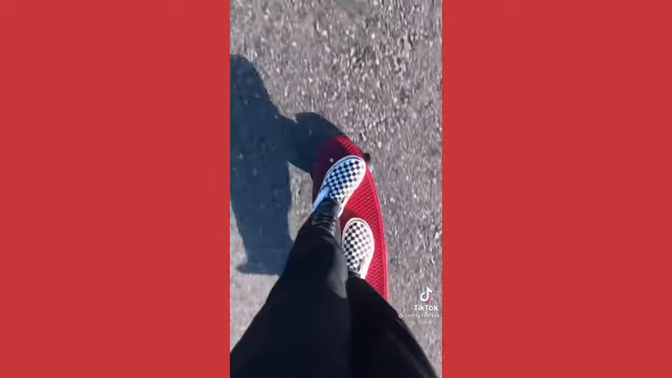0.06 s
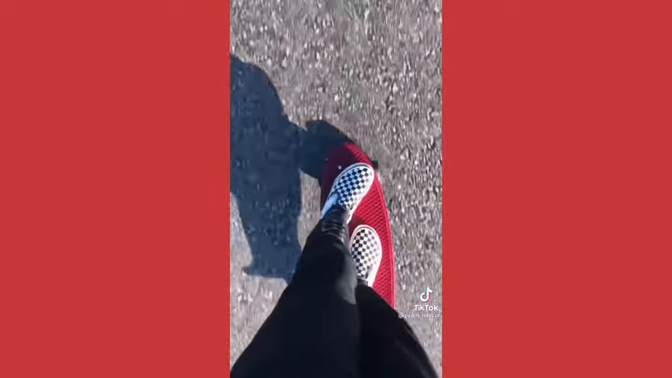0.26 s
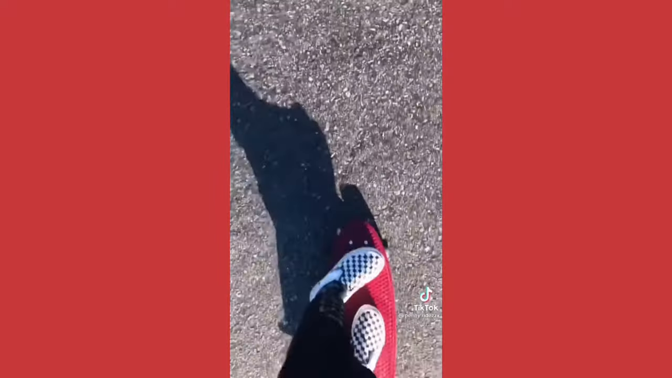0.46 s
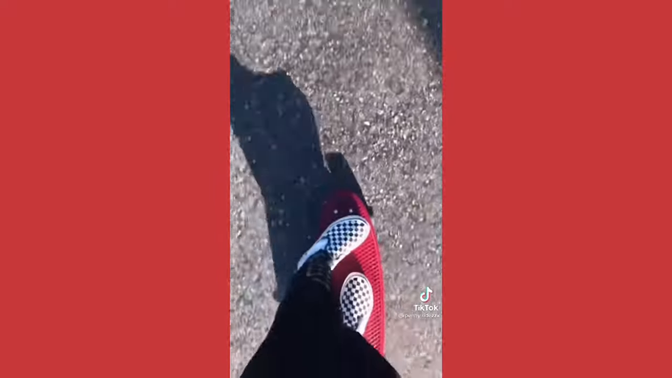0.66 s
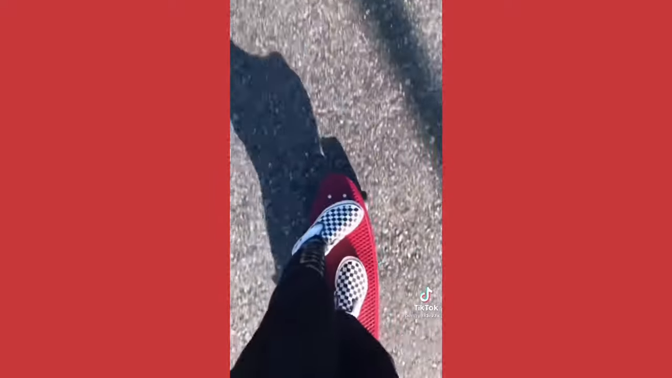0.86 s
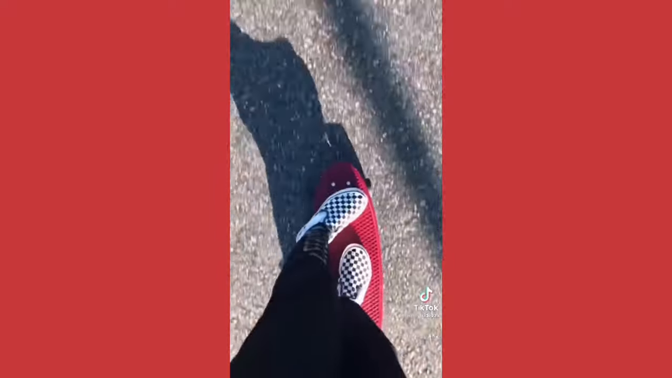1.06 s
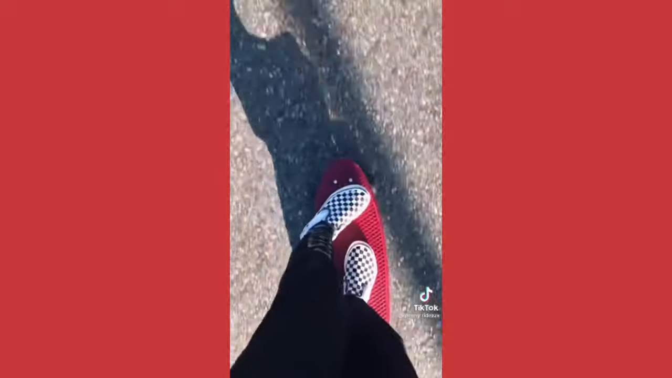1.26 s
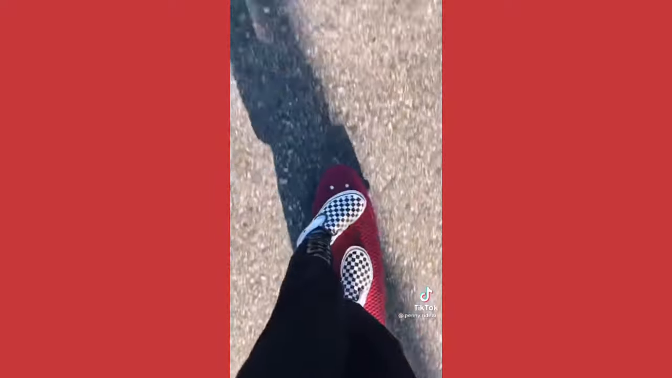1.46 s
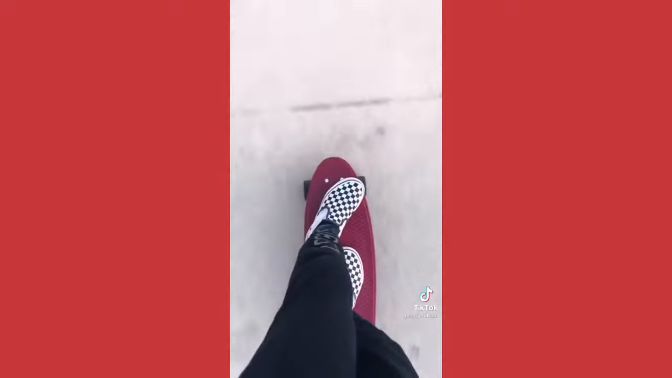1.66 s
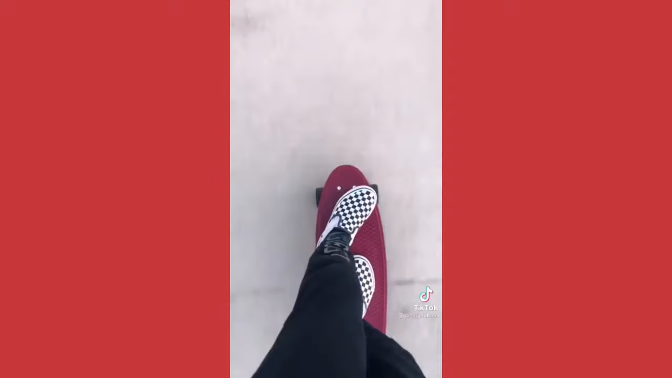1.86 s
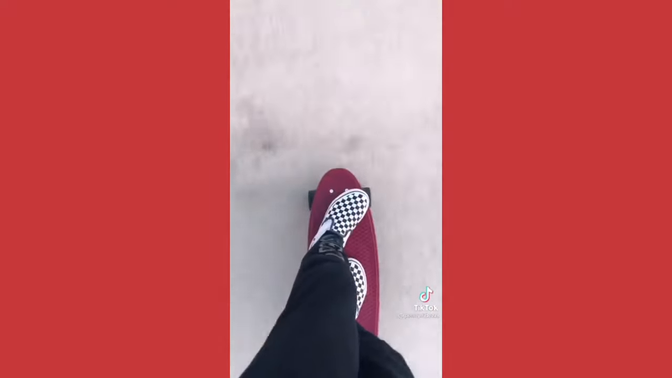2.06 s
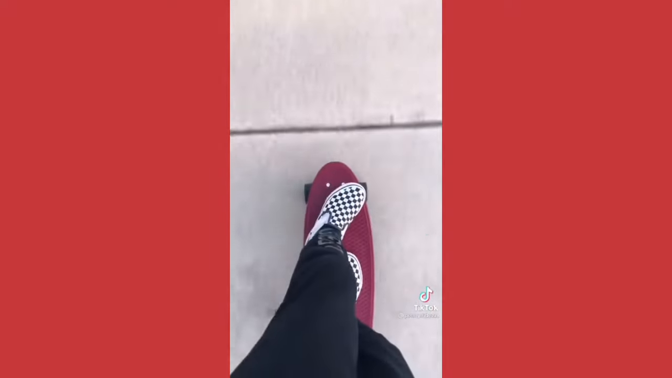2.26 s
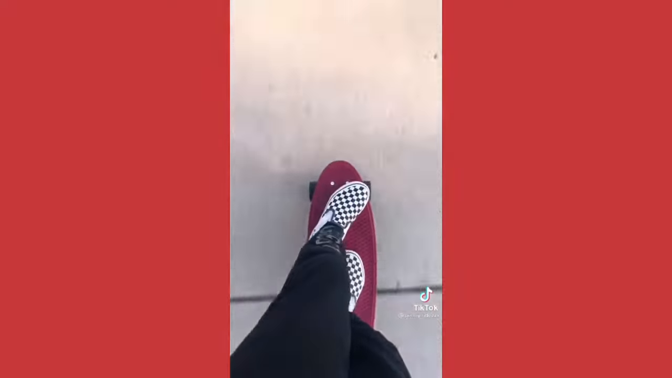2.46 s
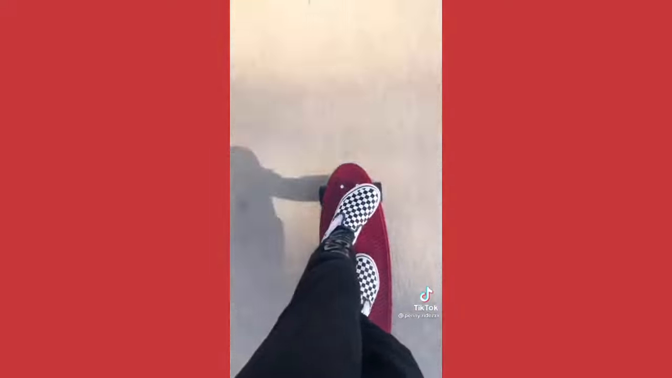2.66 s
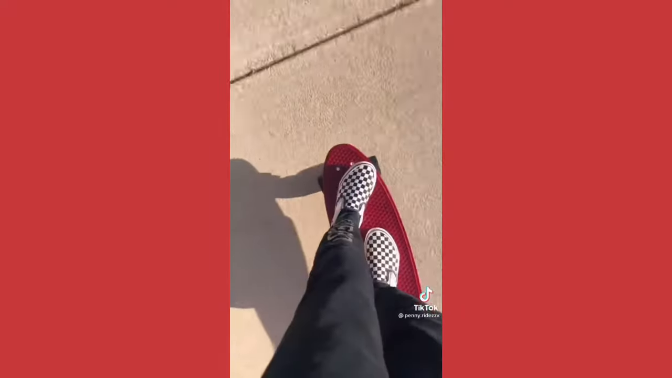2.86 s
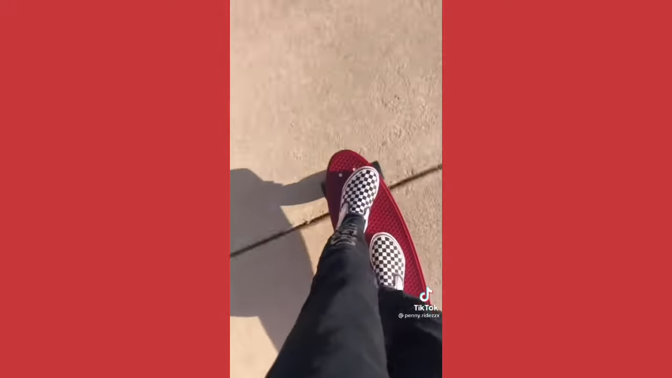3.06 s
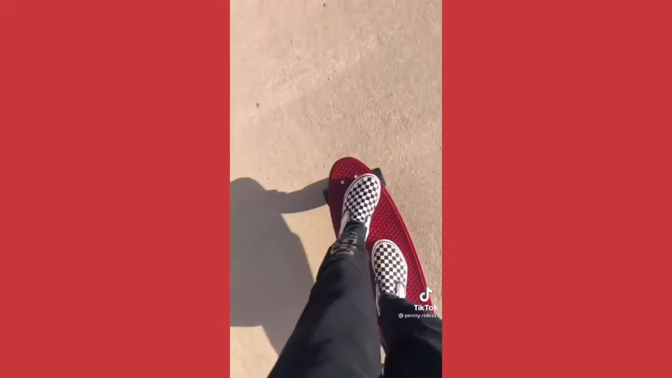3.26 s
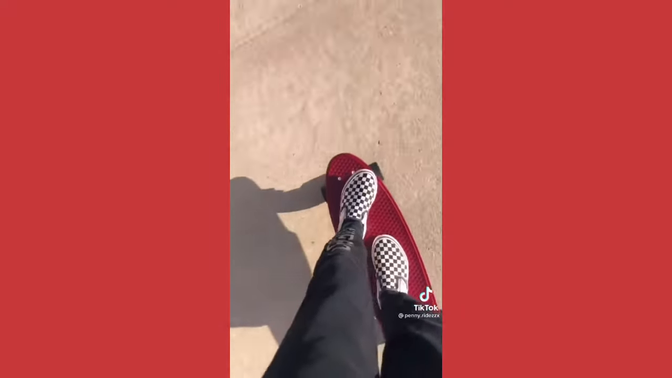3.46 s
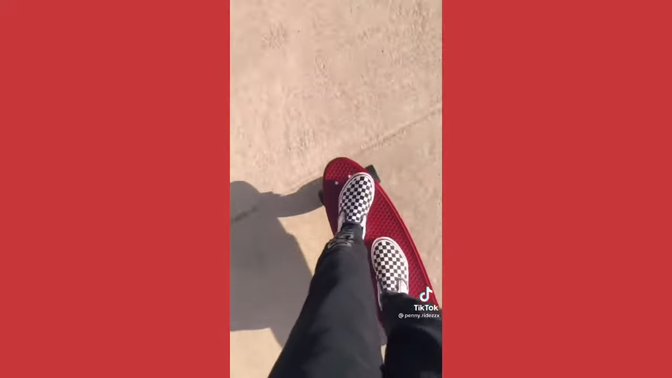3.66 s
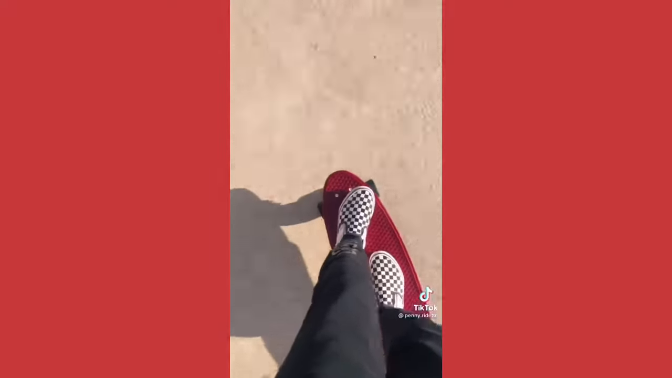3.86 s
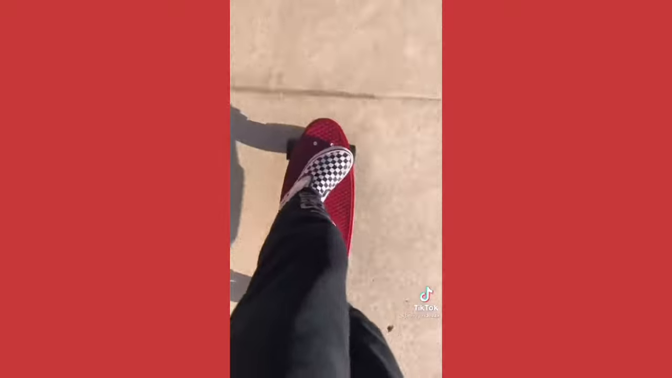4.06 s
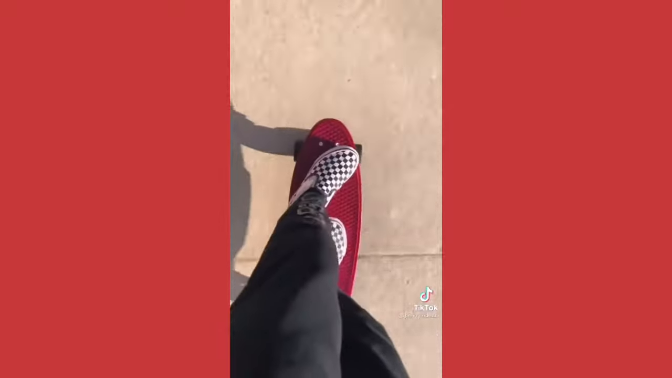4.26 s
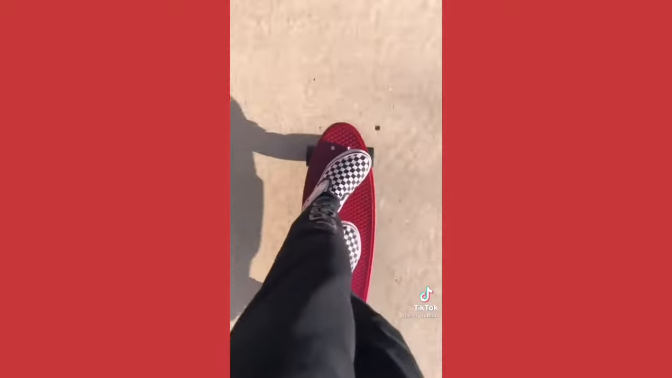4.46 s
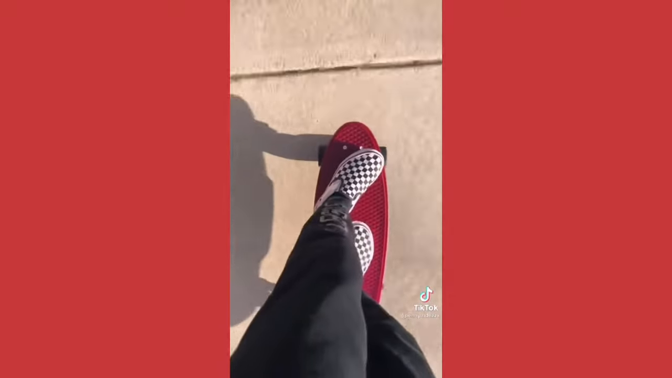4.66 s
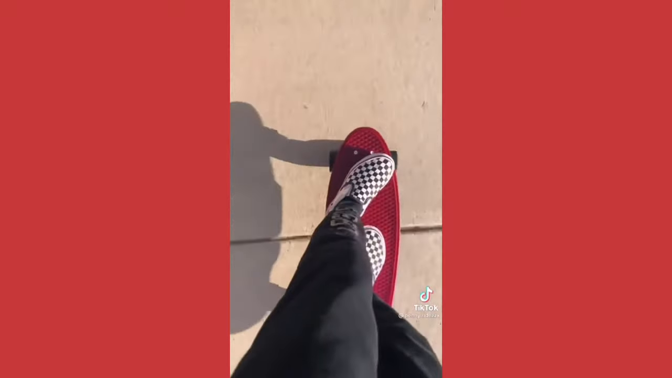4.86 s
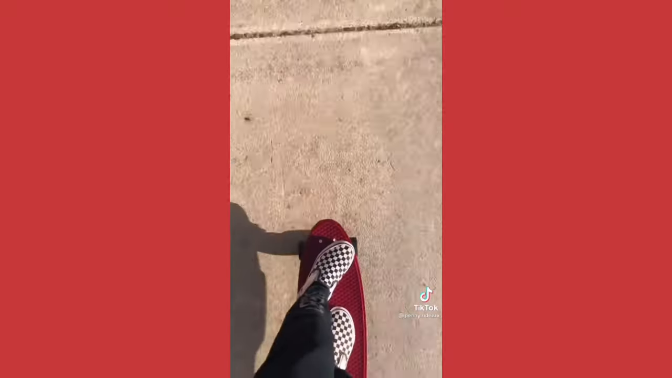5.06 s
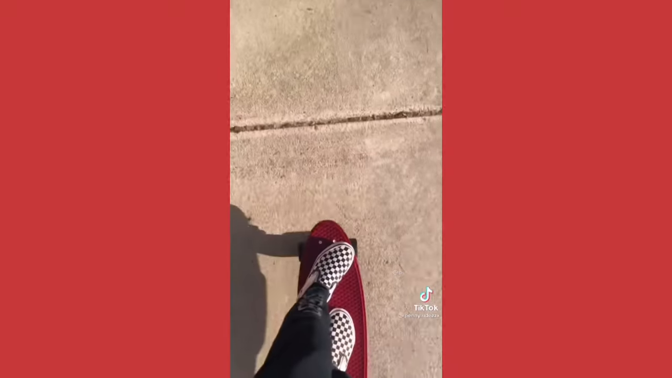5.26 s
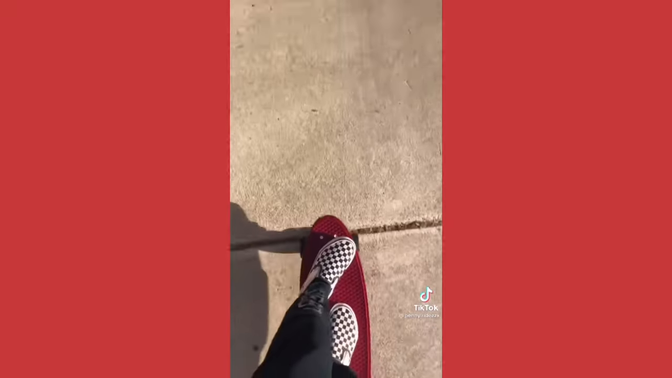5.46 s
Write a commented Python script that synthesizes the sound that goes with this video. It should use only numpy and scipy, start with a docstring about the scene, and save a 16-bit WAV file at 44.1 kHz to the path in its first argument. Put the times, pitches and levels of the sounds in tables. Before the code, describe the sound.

Six brief passages of a plastic skateboard rolling outdoors, separated by total silences of about a tenth of a second. The first two are rough and crackly on asphalt, with loose axle rattle. The rest run over concrete slabs, softer and steadier, broken by loud paired knocks as front and rear wheels strike the joints. Close, dry microphone held by the rider above the board.

```python
"""On coarse asphalt, then on concrete slabs, a small plastic skateboard rolls, heard from above it.
Random grit impulses excite the modes of the deck and rattle the loose steel of the axles; tread hiss and a
low rumble are shaped noise. At each slab joint a wheel pair drops in and hits the far edge: short rough
contacts ring the deck, rim and steel, and the rider's weight lands. Short silences part six passages."""
import sys
import numpy as np
from scipy import signal
from scipy.fft import rfft, irfft, next_fast_len
from scipy.io import wavfile
from scipy.ndimage import map_coordinates

SR = 44100
rng = np.random.default_rng(int(sys.argv[2]) if len(sys.argv) > 2 else 0)


def pcm_store(signal):
    """Save signal as 16-bit PCM."""
    levels = np.round(np.clip(np.atleast_2d(signal), -1, 1) * 32767)
    wavfile.write(sys.argv[1], SR, levels.astype(np.int16).T)


N = 243123

# silences between the six passages: start_s, end_s
SILENCES = [(0.3252, 0.4511), (1.4593, 1.5853), (2.693, 2.8086), (3.8612, 3.969), (5.0252, 5.1401)]
# resonances of the deck and wheels, low to high: centre_hz, width_hz, relative level_db
DECK = [(343, 305, -9.5), (492, 31, -7), (588.2, 87, 3), (680, 50, -29.5), (870, 240, -17),
        (1128, 110, -15), (1660, 280, -28), (2123, 61, -28.5), (2367, 394, -35.5), (4400, 1100, -52.5)]
# resonances of washers, axle and bearings, low to high: centre_hz, width_hz, relative level_db
STEEL = [(4460, 1500, 0.5), (7750, 580, 8.5), (8400, 1500, -2), (9800, 1100, -8.5), (11480, 550, -12.5),
         (13450, 2400, 2)]


def amp(db):
    """Amplitude ratio: 20 dB is a factor of ten."""
    return 10 ** (np.asarray(db) / 20)


def unit(x):
    """Normalisation to an rms amplitude of 1."""
    return x / np.sqrt(np.mean(x ** 2) + 1e-20)


def curves(rows):
    """Linear interpolation over time: one curve for each column after the time."""
    time_s, *columns = np.transpose(rows)
    return [np.interp(np.arange(N) / SR, time_s, column) for column in columns]


def wobble(rate):
    """Slow random modulation: a smooth curve through rate random knots a second."""
    knots = rng.standard_normal(int(N * rate / SR) + 4)
    return map_coordinates(knots, [np.arange(N) * rate / SR])


def filtered(x, response):
    """Linear filtering: the spectrum of x times a response given as a function of frequency."""
    n = x.shape[-1]
    padded = 2 * next_fast_len(n // 2 + 2048)
    spectrum = rfft(x, padded) * response(np.fft.rfftfreq(padded, 1 / SR))
    return irfft(spectrum, padded)[..., :n]


def ringing(modes):
    """Modal resonance with minimum phase; soft wheels dull the upper skirt of each mode."""
    def response(f):
        f = f + 1  # avoids division by zero
        power = 0
        for centre, width, db in modes:
            resonance = amp(2 * db) / (1 + ((f * f - centre * centre) / (f * width)) ** 2)
            power = power + resonance / (1 + (f / (1.336 * centre)) ** 4)
        # folding the cepstrum onto positive times makes the response causal
        cepstrum = irfft(np.log(power + 1e-14) / 2)
        half = cepstrum.shape[-1] // 2
        cepstrum[..., 1:half] *= 2
        cepstrum[..., half + 1:] = 0
        return np.exp(rfft(cepstrum))
    return response


def grit(per_s, spread_db):
    """Shot noise: random tiny pushes of either sign, a few much larger than the rest."""
    chance, side, size = rng.random((3, N))
    occurs = chance < per_s / SR
    return occurs * np.sign(side - .5) * amp(-spread_db * np.log(size + 0.0024))


def knock(modes, peak_db, contact_ms, shudder_db=-60, shudder_s=.05, size=SR // 12):
    """Impact excitation: rows of rough pushes and decaying ragged shudders ring the modes up to set peaks."""
    t = np.arange(size) / SR
    phase = t / (np.maximum(contact_ms, .2)[:, None] / 1000)
    progress = np.clip(phase, 0, 1)  # 0 to 1 through the contact
    knots = rng.standard_normal((len(phase), 40))
    places = np.broadcast_arrays(np.arange(len(phase))[:, None], t * 400)  # 400 knots a second
    ragged = amp(4.2 * map_coordinates(knots, places))
    shudder = amp(shudder_db - 60 * t / shudder_s) * progress * ragged  # falls 60 dB in shudder_s
    push = (np.sin(np.pi * progress) ** 2 + shudder) * rng.standard_normal(phase.shape)
    ring = filtered(push, ringing(modes))
    envelope_peak = np.abs(signal.hilbert(ring)).max(1)
    return ring * (amp(peak_db) / envelope_peak)[:, None]


def add(track, times, rows):
    """Superposition: each row is summed into the track at its time."""
    for s, row in zip(times, rows):
        part = track[round(s * SR):][:len(row)]
        part += row[:len(part)]
    return track


def low_rumble():
    """Broadband excitation by ground and wind: noise with a falling spectrum."""
    # spectrum of the rumble: frequency_hz, relative level_db
    spectrum = [(15, -36.5), (25, -1.5), (44, -1), (120, -0.5), (200, -6.5), (400, -12.5), (800, -52.5),
                (2000, -120)]
    hz, db = np.transpose(spectrum)
    noise = rng.standard_normal(N)
    return unit(filtered(noise, lambda f: amp(np.interp(np.log(f + 1), np.log(hz), db))))


def sand_like_hiss():
    """Band-shaped noise under an exponential envelope: a short hiss like sand swells, then stops."""
    peak_s, hiss_db = 1.645, -46
    swell_db_per_s, stop_db_per_s = 110, 750
    t = np.arange(N) / SR - peak_s
    level_db = hiss_db + np.where(t < 0, swell_db_per_s, -stop_db_per_s) * t
    noise = rng.standard_normal(N)
    return amp(level_db) * unit(filtered(noise, ringing([(7990, 1000, 0), (13000, 9200, 0)])))


def tread_hiss():
    """Friction noise of the tread: steady noise in two broad resonances."""
    noise = rng.standard_normal(N)
    return unit(filtered(noise, ringing([(4140, 3700, 6.5), (9500, 5000, -3.5)])))


def axle_chatter(shake):
    """Intermittent contact of loose parts: two trains of pushes and noise share the same bursts."""
    burst = amp(2.26 * shake + 4.3 * wobble(120) + 4.5 * wobble(31.29))
    trains = []
    for part in range(2):
        pushes = unit(grit(970, 3.8) * burst * amp(0.6 * wobble(90)))
        trains.append(pushes + 0.32 * unit(burst * rng.standard_normal(N)))
    return trains


def steel_rattle(chatter):
    """Modal ringing of small steel: chatter excites washers and bearings, which radiate no lower tones."""
    washers = filtered(chatter[0], ringing(STEEL[1:3]))
    bearings = filtered(chatter[1], ringing(STEEL[3:]))
    rattle = unit(washers + bearings)
    return filtered(rattle, lambda f: 1 / np.sqrt(1 + (6600 / (f + 1)) ** 8))


def wheel_clatter(chatter):
    """Forced vibration: wheels knocking on their axles ring the highest modes."""
    return unit(filtered(chatter, ringing(DECK[7:])))


def sharp_stones(shake):
    """Sparse impulse excitation: sharp stones ring the upper modes of the deck."""
    pushes = grit(900, 4.3) * amp(1.5 * shake)
    return unit(filtered(pushes, ringing(DECK[3:9])))


def deck_roar(coarse_db, shake):
    """Roughness excitation: the grit under the wheels drives all modes of the deck."""
    pushes = grit(2500, coarse_db) / amp(1.26 * coarse_db)  # offsets the larger pushes of coarse ground
    return unit(filtered(pushes * amp(1.07 * coarse_db * shake), ringing(DECK)))


def rolling():
    """Rolling noise: ground roughness shakes deck, tread, wheels and steel together, above a low rumble."""
    # levels over time: time_s, deck_db, axle_rattle_db (before its drift), rumble_db (before its wobble)
    levels = [(0, -31.5, -51, -33), (.07, -33, -60.5, -38), (.19, -25.5, -48.5, -35), (.3, -31.5, -59, -44),
              (.5, -31, -55, -38.5), (.85, -30.5, -55, -43), (.91, -28, -51, -40),
              (1.01, -30.5, -60, -39.5), (1.4, -31, -55, -39.5), (1.62, -28.5, -52, -36.5),
              (1.8, -32, -75.5, -39), (2.09, -33, -62.5, -38), (2.5, -32, -62.5, -33.5),
              (2.85, -34.5, -62.5, -38), (3.1, -35, -60.5, -31.5), (3.45, -35, -64, -38.5),
              (3.8, -34, -61.5, -35.5), (4.05, -37, -68, -36.5), (4.45, -37, -65.5, -38),
              (4.7, -33.5, -60.5, -37), (5.0, -38, -71, -36), (5.2, -37.5, -64.5, -38.5),
              (5.51, -35, -55, -32)]
    # one row a passage: coarseness_db (scales the spread of grit sizes);
    # relative to the deck: tread_db, wheel_clatter_db, upper_mode_db
    ground = [(2.601, -38, -16.5, -16.5), (2.6, -49, -20.5, -12), (.73, -30.5, -20, -20.5),
              (0.728, -33.5, -22.5, -18.5), (.73, -33.5, -43, -26), (1.701, -33.5, -20.5, -13.5)]
    deck_db, rattle_db, rumble_db = curves(levels)
    passage = np.searchsorted([end for start, end in SILENCES], np.arange(N) / SR)
    coarse_db, tread_db, clatter_db, upper_db = np.transpose(ground)[:, passage]
    shake = wobble(60)  # patches of rougher ground
    chatter = axle_chatter(shake)
    drift_db = 2.5 * wobble(9)  # the rattle comes and goes
    board = amp(rumble_db + 1.0 * wobble(10)) * low_rumble()
    board += amp(deck_db + tread_db + 2.1 * shake) * tread_hiss()
    board += amp(rattle_db + drift_db) * steel_rattle(chatter)
    board += amp(deck_db + clatter_db) * wheel_clatter(chatter[0])
    board += amp(deck_db + upper_db) * sharp_stones(shake)
    return board + amp(deck_db) * deck_roar(coarse_db, shake)


def ticks():
    """Impact of small stiff bodies: loose steel parts click together."""
    # clearest ticks: time_s, peak_db
    clicks = [(0.167, -31), (0.454, -36), (0.619, -34.5), (0.73, -37), (0.788, -40), (0.9687, -45),
              (1.038, -34.5), (1.0944, -36), (1.1473, -33.5), (1.419, -35.5), (2.0612, -39.5),
              (2.097, -38.5), (2.3025, -27.5), (2.944, -41.5), (4.0208, -46), (4.785, -41.5), (5.1654, -45),
              (5.284, -38.5), (5.3765, -37.5)]
    time_s, peak_db = np.transpose(clicks)
    contact_ms = np.full(len(time_s), 3.5)
    rows = knock(STEEL[1:], peak_db, contact_ms, -15, 0.011)
    return add(np.zeros(N), time_s - .0005, rows)


def stones():
    """Impulse response: each larger stone gives the lower modes of the deck one short knock."""
    # largest single stones: time_s, peak_db
    largest = [(0.128, -16), (0.193, -25), (0.456, -17), (0.544, -19.5), (0.63, -17), (0.739, -17.5),
               (0.842, -18), (0.909, -14), (0.935, -15), (0.974, -16), (1.042, -16), (1.158, -15.5),
               (1.24, -20), (1.269, -15.5), (1.349, -17.5), (1.39, -17.5), (5.22, -20.5), (5.304, -29),
               (5.391, -23.5)]
    time_s, peak_db = np.transpose(largest)
    contact_ms = np.full(len(time_s), 8)
    rows = knock(DECK[:6], peak_db, contact_ms, -8.5, 0.04)
    return add(np.zeros(N), time_s - .0008, rows)


def joints():
    """Impact on an edge: each blow rings deck, rim and steel; once a crossing the rider's weight lands."""
    # blows of wheel on slab edge: time_s, main_peak_db, main_mode_hz, low_peak_db, upper_peak_db
    blows = [(1.727, -6.5, 485, -23, -23), (1.741, -21.5, 557, -13.5, -15), (1.908, -4, 548, -24, -30),
             (1.924, -25, 505, -29, -17.5), (1.934, -17.5, 525, -21, -26.5), (2.308, -0.5, 544, -4, -15),
             (2.323, -1, 535, -7.5, -11), (2.335, -26, 557, -23, -28), (2.492, -4.5, 576, -18, -36),
             (2.508, -19, 470, -15.5, -21), (2.515, -12.5, 565, -35, -16), (2.532, -17, 532, -27, -24),
             (3.009, -4, 536, -3.5, -10.5), (3.023, -4.5, 500, -9.5, -15), (3.036, -12, 580, -19, -21.5),
             (3.207, -7.5, 650, -13, -25), (3.223, -2.5, 630, -7.5, -16), (3.236, -16, 565, -35, -24),
             (3.671, -17, 576, -9, -20), (3.68, -18, 570, -9.5, -18), (3.69, -14.5, 525, -15.5, -16),
             (3.712, -20.5, 584, -26, -22.5), (4.105, -13.5, 565, -14, -14), (4.118, -9.5, 520, -11.5, -26),
             (4.307, -11.5, 483, -18, -37), (4.313, -14, 554, -36, -16.5), (4.324, -5.5, 593, -17.5, -17),
             (4.739, -1, 522, -5, -8.5), (4.744, -7, 533, -26, -18), (4.755, -12, 524, -15.5, -28),
             (4.953, 0, 605, -12, -16), (4.972, -4, 577, -17, -18), (4.981, -15, 520, -16, -21),
             (5.455, -25.5, 432, -4, -9.5), (5.468, -2.5, 543, -39, -44), (5.48, -39, 610, -21, -19.5)]
    # a wheel pair crosses a joint: first_touch_s, snap_db, snap_hz, steel_jar_db, landing_delay_s, thud_db
    # (snap and jar before the adjustments for weaker and later blows)
    crossings = [(1.725, -23, 1400, -28.5, 0.0087, -36), (1.905, -25.5, 1700, -38, .027, -23),
                 (2.308, -16, 2020, -24.5, 0.018, -18), (2.49, -24, 2070, -31, .023, -16),
                 (3.011, -7, 1300, -27, 0.0036, -20), (3.204, -32, 1510, -29.5, 0.016, -25),
                 (3.671, -19, 1390, -35.5, 0.016, -27.5), (4.104, -33, 1500, -34, 0.015, -21),
                 (4.307, -27, 1690, -37, 0.02, -55), (4.738, -15, 1350, -25.5, 0.023, -19),
                 (4.952, -15, 1630, -28, 0.02, -18.5), (5.453, -4, 2280, -25.5, 0.027, -14.5)]
    time_s, main_db, main_hz, low_db, upper_db = np.transpose(blows)
    first_s, snap_db, snap_hz, jar_db, landing_s, thud_db = np.transpose(crossings)
    crossing = np.searchsorted(first_s, time_s + .005) - 1  # the crossing each blow belongs to

    # a weaker blow loses 0.8 dB of snap and jar for each dB under the strongest of its crossing
    force_db = 10 * np.log10(amp(2 * main_db) + amp(2 * low_db))
    strongest_db = np.array([force_db[crossing == k].max() for k in crossing])
    weaker_db = 0.8 * (force_db - strongest_db)
    steel_db = jar_db[crossing] + weaker_db
    late_db = 800.5 * (time_s - first_s[crossing])  # the rim snaps less on later blows
    rim_db = snap_db[crossing] + weaker_db - late_db

    base_ms = 8  # contact time that each part scales
    contact = np.full(len(time_s), base_ms)
    bent = main_hz[:, None] / DECK[2][0]  # the load on the wheels shifts the main modes
    main_modes = [(centre * bent, 1.02 * width, db) for centre, width, db in DECK[1:4]]
    rows = knock(main_modes, main_db, contact, -14, 0.12)
    rows += knock(DECK[:1], low_db, contact, -6.0, 0.066)
    rows += knock(DECK[4:7], upper_db, 0.55 * contact, -7, 0.068)
    # the wheel rim cracks on the edge
    rows += knock([(snap_hz[crossing, None], 480, 0)], rim_db, 0.67 * contact, -12, .045)
    rows += knock(STEEL, steel_db, 1.1 * contact, -1.3, 0.09)
    # grit crunches at the slab edge
    rows += knock(STEEL[:1], steel_db - 12.0, contact, -8.5, 0.069)
    # the wheels knock on their axles
    rows += knock(DECK[7:9], steel_db + 3, 1.07 * contact, -4.5, 0.078)
    # the weight lands on the flexing board
    thuds = knock([(78, 72, 0)], thud_db, np.full(len(first_s), base_ms))
    track = add(np.zeros(N), time_s - .0024, rows)
    return add(track, first_s + landing_s, thuds)


def scene():
    """Superposition of all that the board makes."""
    return (sand_like_hiss() + rolling() + ticks() + stones() + joints())[None]


def record(dry):
    """Saturation near full scale, silence between passages, then low-pass filtering by the microphone."""
    top_hz, mic_hz = 15730, 12980  # band limit; treble falls above mic_hz
    x = dry / (1 + np.abs(dry / .95) ** 6) ** (1 / 6)
    t = np.arange(N) / SR
    for start, end in SILENCES:
        x = x * ((t < start) | (t > end))
    return filtered(x, lambda hz: (hz < top_hz) / np.sqrt(1 + (hz / mic_hz) ** 22))


dry = scene()
out = record(dry)
pcm_store(out)
```